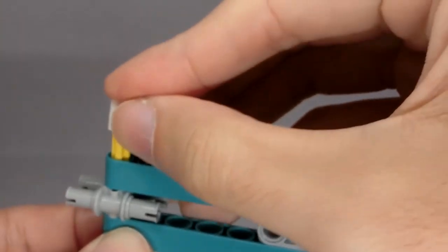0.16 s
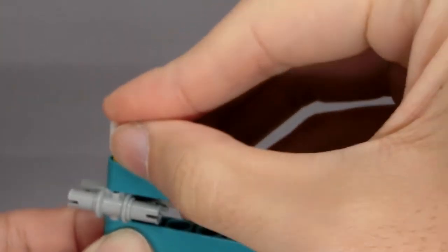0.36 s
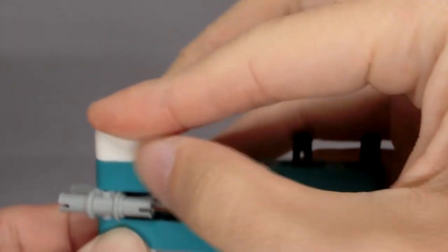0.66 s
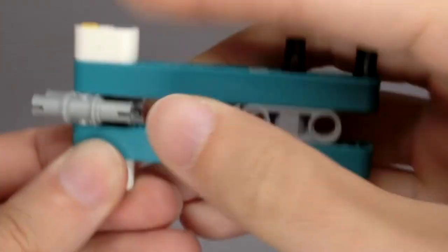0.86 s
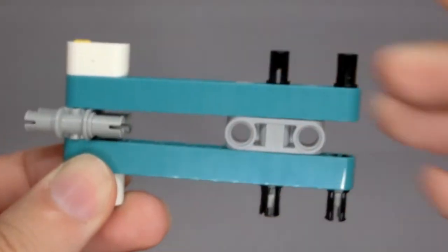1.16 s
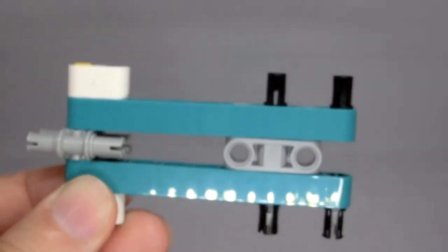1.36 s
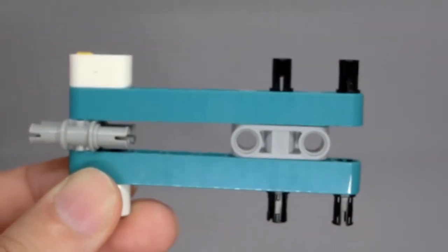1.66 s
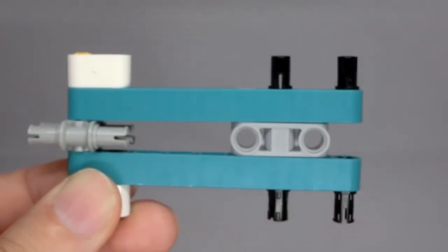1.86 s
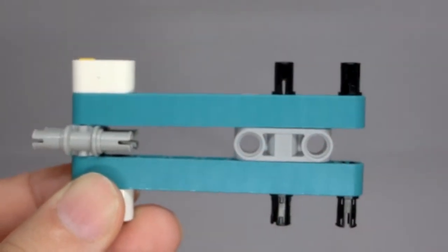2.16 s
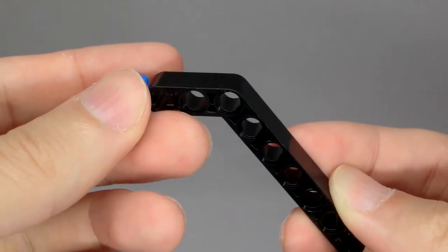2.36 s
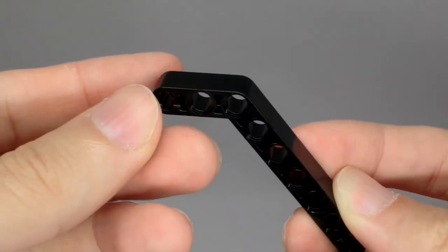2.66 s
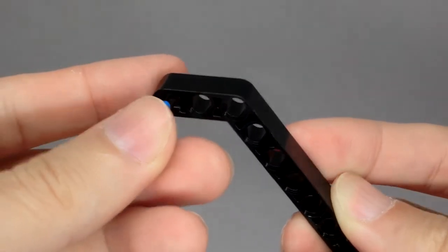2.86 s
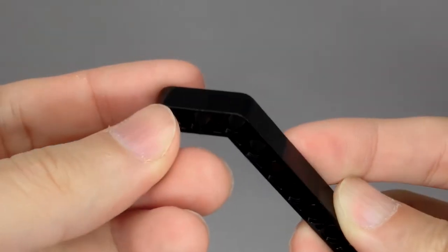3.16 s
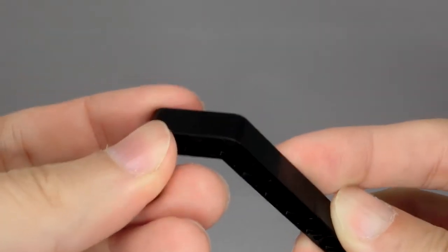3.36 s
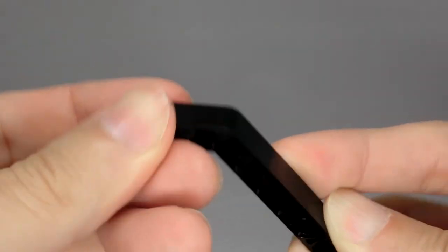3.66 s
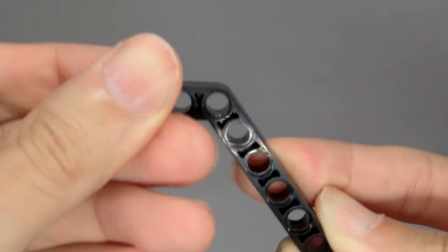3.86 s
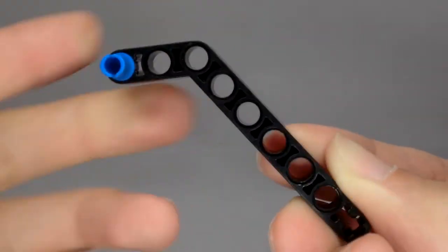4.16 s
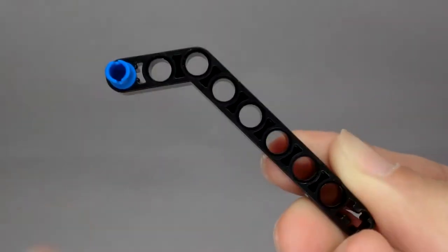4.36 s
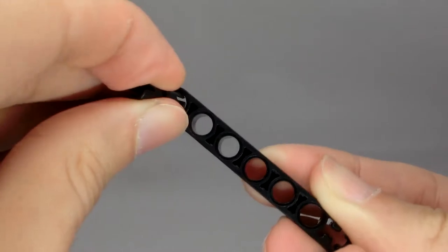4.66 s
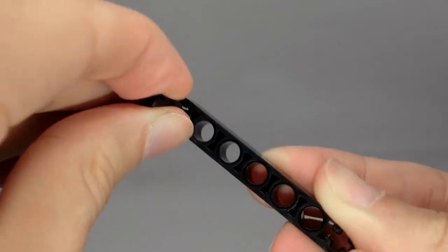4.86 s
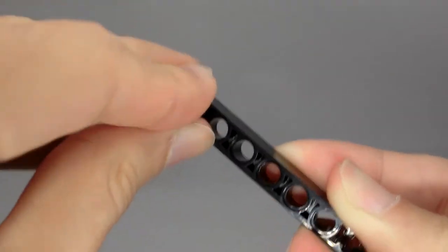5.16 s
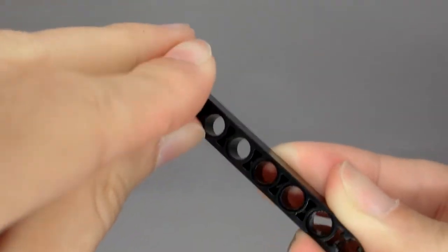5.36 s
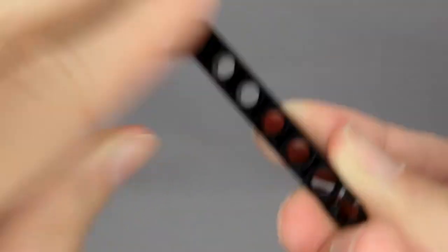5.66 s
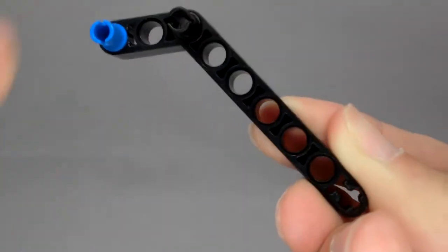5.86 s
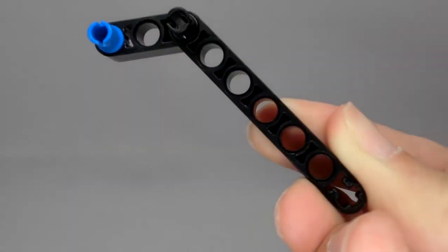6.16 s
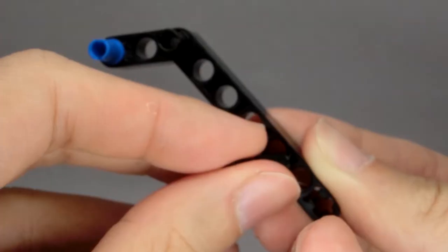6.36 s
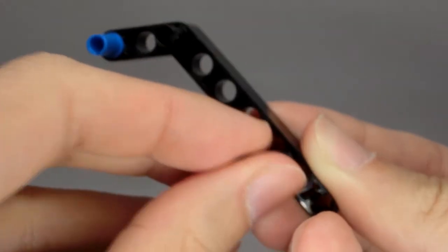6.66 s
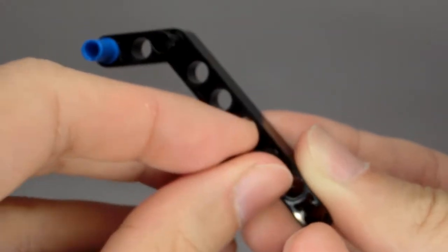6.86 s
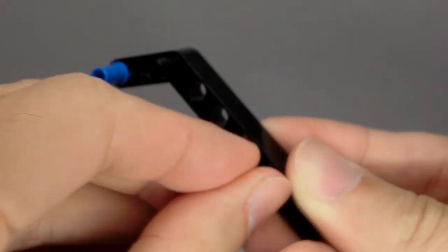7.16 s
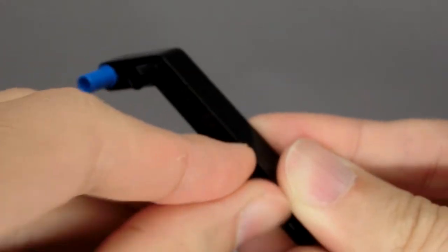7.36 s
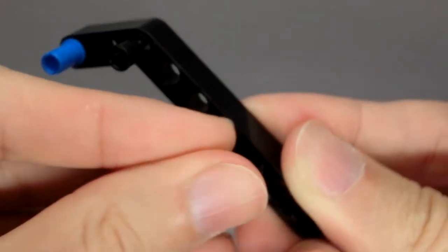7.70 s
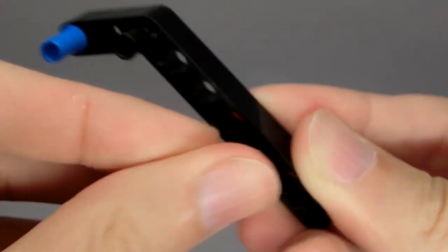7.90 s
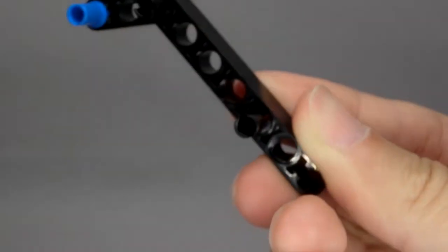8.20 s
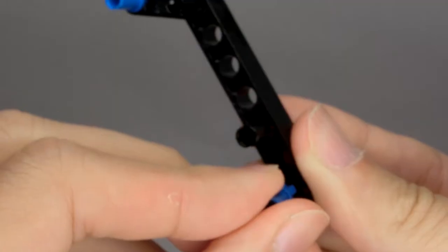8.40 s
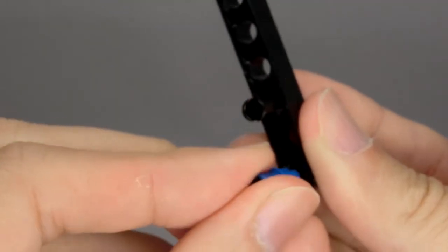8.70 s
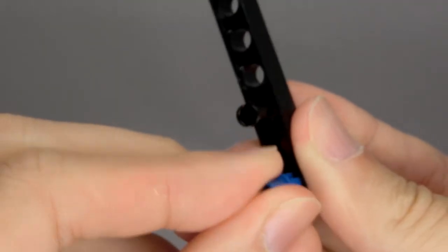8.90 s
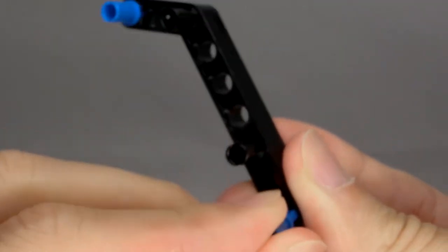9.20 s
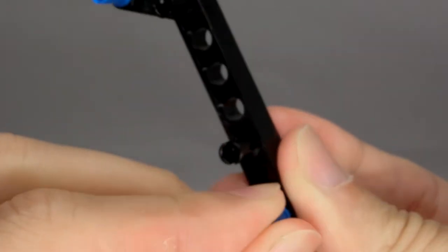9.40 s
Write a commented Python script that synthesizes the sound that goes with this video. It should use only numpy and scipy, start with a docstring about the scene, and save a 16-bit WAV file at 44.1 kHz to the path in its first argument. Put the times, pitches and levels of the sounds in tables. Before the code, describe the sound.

A quiet small room with steady faint hiss, slight rumble and a distant low motor hum; the pickup is close and in stereo. A light tick at 0.05 s leads to a sharp, bright plastic snap at 0.3 s and another, crisper one at 0.56 s, each a tight double hit with a few milliseconds of rattle and a short room reply. Weak ticks follow at 0.85, 1.17 and 2.0 s, then a sprinkle from 2.6 to 3.5 s, clearest near 2.76. Around 3.9 s fingertips rub jerkily with tiny thin squeaks, then a tick at 4.07 and a faint airy rub at 4.6. A third strong snap, lower and fuller, lands at 5.45 s. Small taps come at 6.7, 7.2 and 7.7 s, low soft rubs and a dull bump from 8.2, a click at 8.73 with faint squeaking to 9.2, and a final tap at 9.34.

```python
"""Three sharp snaps of plastic pins and connectors pressed by hand into plastic beams in a small quiet room.
Each snap is two quick landings and a rattle, filtered by the ring of the plastic; the room answers.
Fainter ticks are built the same way. Finger rubs are jerky noise in gliding resonances; squeaks are thin tones.
Behind them, soft hand bumps and a low motor hum are sines; a steady hiss and a faint rumble are noise."""
import sys
import numpy as np
from scipy import signal
from scipy.fft import rfft, irfft
from scipy.io import wavfile
from scipy.ndimage import uniform_filter1d

SR = 44100
rng = np.random.default_rng(int(sys.argv[2]) if len(sys.argv) > 2 else 0)


def materialize(psi):
    """Save the field psi as 16-bit PCM at rate SR to the path in sys.argv[1].

    A 1-D psi becomes a single channel; in a 2-D psi each row is a channel.
    """
    bounded = np.clip(np.atleast_2d(psi).T, -1, 1)
    quanta = np.round(bounded * 32767).astype(np.int16)
    wavfile.write(sys.argv[1], SR, quanta)


N = 420713  # length in samples, about 9.5 s

SWAP_S = 2.4  # clicks before this time are in a stack of parts, later ones in a single bent beam


def gain_of(db):
    """Turns decibels into an amplitude factor."""
    return 10 ** (np.asarray(db) / 20)


def evened(x):
    """Scales a signal to an rms of 1."""
    return x / np.sqrt(np.mean(x ** 2) + 1e-20)


def read(points, hz):
    """Reads a table of (frequency, value) between its points, on a log-frequency axis."""
    f, value = np.transpose(points)
    return np.interp(np.log(hz + 1), np.log(f + 1), value)


def add(mix, s, sound):
    """Adds a sound to both channels from time s, cut off at the end of the mix."""
    part = mix[:, max(round(s * SR), 0):][:, :sound.shape[-1]]
    part += sound[..., :part.shape[1]]


def pair(size, likeness):
    """Makes two channels of white noise that are partly alike."""
    a, b = rng.standard_normal((2, size))
    mixed = likeness * a + np.sqrt(1 - likeness ** 2) * b
    return np.array([mixed, a])


def causal(gain):
    """Finds the quickest-starting (minimum-phase) impulse response with this gain spectrum."""
    both_halves = np.r_[gain, gain[-2:0:-1]]
    log_gain = np.log(np.maximum(both_halves, 1e-6))
    spectrum = np.exp(np.conj(signal.hilbert(log_gain)))
    return irfft(spectrum[:len(gain)])


def coloured(sound, gains):
    """Filters each channel by its own gain spectrum."""
    responses = np.array([causal(gain) for gain in gains])
    return signal.fftconvolve(sound, responses, axes=1)


def colour(sound):
    """Finds the smoothed gain spectrum of a short sound."""
    power = np.abs(rfft(sound, 2048)) ** 2
    return np.sqrt(uniform_filter1d(power, size=19))


def air(hiss_db=-61.3, rumble_db=-66, rumble_hz=85):
    """Room noise: steady noise shaped over frequency, over a faint rumble of low-passed noise."""
    # shape of the hiss: f/Hz, relative level per Hz/dB
    air_levels = [(53, -27), (90, 2), (117, -2), (165, -3.5), (201, -1), (266, -7.5), (330, -8.5),
                  (430, -7.5), (620, -12), (1320, -17.5), (2800, -21), (4750, -23.5), (6400, -24.1),
                  (7200, -22.5), (11600, -23.5), (12300, -23.5), (13000, -24.5), (14700, -25), (16000, -39)]
    # how alike left and right are: f/Hz, likeness (1 = the same)
    air_likeness = [(60, 0.28), (150, 0.57), (380, 0.61), (950, 0.22), (2380, 0.093), (5980, 0.52),
                    (15000, 1)]
    # balance of the hiss: f/Hz, left over right/dB
    air_lean = [(60, 0), (240, -1), (950, -1), (3770, -1), (15000, 0)]
    hz = np.fft.rfftfreq(N, 1 / SR)
    a, b = rfft(rng.standard_normal((2, N)))
    same = read(air_likeness, hz)
    noise = np.array([a, same * a + np.sqrt(1 - same ** 2) * b])
    side_db = np.outer([.5, -.5], read(air_lean, hz))
    hiss = irfft(noise * gain_of(read(air_levels, hz) + side_db), N)
    hiss = gain_of(hiss_db) * hiss / hiss.mean(0).std()  # level of the average of both channels
    rumble_gain = hz / (hz + 40) / (1 + (hz / rumble_hz) ** 6)
    rumble = irfft(rfft(pair(N, likeness=0.8)) * rumble_gain, N)
    return hiss + gain_of(rumble_db) * evened(rumble)


def hum(hum_hz=58.25, hum_db=-55.3, octave_db=-23, left_over_right_db=-1):
    """A distant motor: one steady low sine and a weak one an octave above."""
    angle = 2 * np.pi * hum_hz * np.arange(N) / SR
    tone = np.sin(angle) + gain_of(octave_db) * np.sin(2 * angle)
    sides = gain_of([[left_over_right_db / 2], [-left_over_right_db / 2]])
    return gain_of(hum_db) * evened(tone) * sides


def bumps(bump_s=0.13):
    """Soft bumps of the hands: short low sines that swell and fade."""
    # t/s, peak level/dB, f/Hz
    bump_list = [(4.43, -52, 30.5), (5.72, -49, 30), (8.245, -45, 42.5)]
    out = np.zeros((2, N))
    for s, db, hz in bump_list:
        t = np.arange(int(bump_s * SR)) / SR
        add(out, s, gain_of(db) * np.sin(2 * np.pi * hz * t) * np.hanning(len(t)))
    return out


def squeaks(waver=.006, flutter_db=2):
    """Under a tight, steady grip the skin slips regularly: thin tones, wavering in pitch and level."""
    # t/s, length/s, rms level/dB, pitch at start/Hz, pitch at end/Hz (before the waver)
    squeak_list = [(3.862, 0.039, -70, 715, 694), (3.963, 0.026, -62, 740, 700),
                   (3.994, 0.069, -66.5, 645, 624), (8.729, 0.098, -69, 455, 490),
                   (8.8, 0.39, -74, 568, 573), (8.92, 0.19, -71.5, 480, 490)]
    out = np.zeros((2, N))
    for s, length, db, start_hz, end_hz in squeak_list:
        size = int(length * SR)
        slow_noise = uniform_filter1d(rng.standard_normal((2, SR)), size=1200)
        drift, grip = evened(slow_noise)[:, :size]
        hz = np.linspace(start_hz, end_hz, size) * (1 + waver * drift)
        tone = np.sin(2 * np.pi * np.cumsum(hz) / SR)
        tone = tone * gain_of(flutter_db * grip) * signal.windows.tukey(size, .5)
        add(out, s, gain_of(db) * evened(tone))
    return out


def resonate(x, hz, width):
    """Filters x by a resonance of gain 1 whose frequency follows the curve hz."""
    turn = np.exp(2j * np.pi * np.cumsum(hz) / SR)
    r = np.exp(-np.pi * width / SR)
    # shift the resonance down to zero, smooth there, shift back
    return 2 * (turn * signal.lfilter([1 - r], [1, -r], x / turn)).real


def rubs(grip_db=2.5):
    """Fingertips on plastic: skin sticks and slips in uneven jerks through a gliding resonance."""
    # t/s, length/s, rms level/dB, resonance at start/Hz, at end/Hz, width of each of two filters/Hz
    rub_list = [(3.862, 0.066, -66.5, 1120, 935, 280), (3.893, 0.03, -61, 418, 400, 200),
                (3.933, 0.019, -60, 660, 690, 200), (3.936, 0.02, -62, 450, 400, 200),
                (3.962, 0.06, -65.5, 640, 587, 300), (4.6, 0.054, -68, 2600, 1400, 3000),
                (4.575, 0.075, -70, 5000, 7500, 9000), (6.709, 0.024, -64.5, 1020, 985, 90),
                (8.211, 0.05, -65.5, 470, 430, 260), (8.27, 0.11, -66.5, 235, 205, 130),
                (8.537, 0.048, -59, 444, 420, 260), (8.586, 0.095, -65, 490, 440, 240),
                (8.69, 0.12, -64, 438, 470, 190)]
    out = np.zeros((2, N))
    for s, length, db, start_hz, end_hz, width in rub_list:
        size = int(length * SR)
        hz = np.linspace(start_hz, end_hz, size)
        grip = evened(uniform_filter1d(rng.standard_normal(SR), size=200))
        slips = (pair(SR, likeness=0.99) * gain_of(grip_db * grip))[:, :size]
        rub = np.array([resonate(resonate(side, hz, width), hz, width) for side in slips])
        add(out, s, gain_of(db) * evened(rub * signal.windows.tukey(size, .5)))
    return out


def room_tail(size, wall_s=0.017, wall_spread_s=0.00053, wall_db=-3):
    """The room's echoes: noise whose bands each die at their own speed, with a swell from the nearest wall."""
    # how fast the room goes quiet: f/Hz, time to fall by 60 dB/s
    room_decay = [(300, 0.27), (1500, 0.079), (4000, 0.18), (8000, 0.13), (15000, 0.12)]
    hz, t, bands = signal.stft(pair(size, likeness=0.91), SR, nperseg=256)
    fade = gain_of(-60 * t / read(room_decay, hz)[:, None])
    tail = signal.istft(bands * fade, SR, nperseg=256)[1][:, :size]
    t = np.arange(size) / SR
    build_up = 1 - np.exp(-t / 0.00092)
    wall = gain_of(wall_db) * np.exp(-((t - wall_s) / wall_spread_s) ** 2)
    tail = tail * (build_up + wall)
    return tail / np.linalg.norm(tail[0])


def contact(hz, click_db, ring_hz, slope_db, thud_db, thud_hz=657, thud_slope_db=10):
    """Spectrum of one contact: a click falling away on both sides of the small part's ring, over a low thud."""
    bright = click_db - slope_db * np.abs(np.log2((hz + 1) / ring_hz))
    # the thud is flat up to thud_hz and falls by thud_slope_db per octave above
    low = thud_db - thud_slope_db * np.maximum(np.log2((hz + 1) / thud_hz), 0)
    return np.hypot(gain_of(bright), gain_of(low))


def flex(hz, flex_hz, flex_db, width_share=.28):
    """Lifts the one bending resonance picked by the place of contact and the grip."""
    # width_share is the width as a share of the frequency
    return np.hypot(1, gain_of(flex_db) / (1 + (2 * (hz / flex_hz - 1) / width_share) ** 2))


def plastic(hz, modes, force, ring_hz, ring_db, valley_db=-3.5, ring_width_hz=780):
    """Spectrum of the short ring of a beam and of the small part that strikes it."""
    power = gain_of(valley_db) ** 2  # floor between the resonances
    for f, width, db in modes:
        power = power + gain_of(db) ** 2 / (1 + (2 * (hz - f) / width) ** 2) ** 2
    power = power * (1 + gain_of(ring_db) ** 2 / (1 + (2 * (hz - ring_hz) / ring_width_hz) ** 2))
    power = power / uniform_filter1d(power, size=220)  # keep the peaks, flatten the broad tilt
    low_cut = 1 / (1 + (240 / (hz + 1)) ** 2)  # small parts give off little bass
    high_cut = 1 / np.sqrt(1 + (hz / 15400) ** 36)
    return np.sqrt(power) * low_cut * high_cut * force


def prongs(t, gap_s, second_db=-10, spread_s=.0008):
    """The two prongs of a split pin land in turn; bending waves carry the treble ahead of the bass."""
    hz = np.fft.rfftfreq(len(t), 1 / SR)
    landings = 1 + gain_of(second_db) * np.exp(-2j * np.pi * hz * gap_s)
    delay = spread_s * (1 - hz / hz[-1])
    blow = irfft(landings * np.exp(-2j * np.pi * np.cumsum(delay) * hz[1]), len(t))
    blow = blow * (t < .005)
    return blow / np.linalg.norm(blow)


def rattle(t, rise_s=.0008, t60_s=.021, uneven_db=2):
    """A pin chatters in its hole: random pushes of uneven strength that start fast and fade."""
    uneven = evened(uniform_filter1d(rng.standard_normal(len(t)), size=20))
    pushes = np.sign(pair(len(t), likeness=.85))
    chatter = pushes * gain_of(-60 * t / t60_s) * (1 - np.exp(-t / rise_s))
    chatter = chatter * gain_of(uneven_db * uneven)
    # light contacts carry little bass
    chatter = signal.lfilter(*signal.butter(1, 1200, "high", fs=SR), chatter)
    return chatter / np.linalg.norm(chatter[0])


def lingering(t, rings, hz, strength):
    """A few sharp resonances sing on after the blow, each as strongly as the blow excites it."""
    phases = rng.uniform(0, 2 * np.pi, len(rings))
    out = np.zeros((2, len(t)))
    for (f, db, t60), phase in zip(rings, phases):
        fade = gain_of(-60 * t / t60)
        level = gain_of(db) * np.array([np.interp(f, hz, side) for side in strength])
        out += np.outer(level, np.sin(2 * np.pi * f * t + phase) * 2 * fade / fade.sum())
    return out


def click(s, hz, force, ring_hz, ring_db, chatter_db, pan_db, lean_full_hz=5500, ring_aim_db=9):
    """A pin springs home, chatters in its hole for some milliseconds, and the room answers."""
    # broad resonances of the stack, then of the bent beam: f/Hz, width/Hz, relative level/dB
    stack_modes = [(506, 560, -1), (1110, 300, 4), (1770, 1700, 8), (2710, 500, 2), (3650, 580, 5),
                   (5320, 1300, 0.5), (7250, 1600, 5), (9530, 900, 7.5), (10700, 2000, 3),
                   (12100, 2600, 10), (14400, 1400, 2)]
    beam_modes = [(250, 140, -1), (553, 120, 4), (760, 84, 4.5), (1035, 360, 8), (1690, 410, 4.5),
                  (2750, 590, 9), (3700, 890, 4), (5150, 980, -1), (6940, 2100, 2), (8000, 1700, -1),
                  (9600, 600, -1), (12040, 1200, -2), (14400, 600, -11)]
    # sharp resonances that outlast the blow: f/Hz, level over the broad ring/dB, time to fall by 60 dB/s
    stack_rings = [(2650, -5, .06), (3460, 3, .08), (6900, -3, .085), (10600, -11, .08), (12100, -19, .09)]
    beam_rings = [(1600, -12, .04), (4070, -4, 0.04), (6980, -3, 0.045), (9020, -4, .035)]
    if s < SWAP_S:
        modes, rings, gap_s, room_db = stack_modes, stack_rings, 0.000281, -14.5
    else:
        modes, rings, gap_s, room_db = beam_modes, beam_rings, 0.000214, -13
    t = np.arange(SR // 4) / SR
    landing = prongs(t, gap_s)
    blow = landing + gain_of(chatter_db) * rattle(t)
    # chatter lengthens a click without changing its colour
    steady = colour(landing) / colour(blow.mean(0))
    # bass spreads to both sides alike; the treble leans fully from lean_full_hz up
    sides = gain_of(np.outer([.5, -.5], pan_db * np.minimum(hz / lean_full_hz, 1)))
    strength = plastic(hz, modes, force, ring_hz, ring_db) * sides / sides.mean(0)
    direct = coloured(blow, strength * steady)
    add(direct, 0, lingering(t, rings, hz, strength))
    # less of the small part's ring reaches the room
    spread = plastic(hz, modes, force, ring_hz, ring_db - ring_aim_db)
    echo = coloured(room_tail(len(t)), spread * np.sqrt(sides))
    return direct + gain_of(room_db) * echo


def ticks():
    """Light ticks and taps of parts touching: a click and a thud, with no knock."""
    # levels are relative, before the plastic shapes them: t/s, click/dB, ring of the small part/Hz,
    # click slope/dB per octave, thud/dB, left over right in the treble/dB, ring/dB, flex/Hz, flex/dB
    tick_list = [(0.0481, -14, 1370, 18, -24, -4, 0, 2400, 6),
                 (0.0496, -22, 1400, 16, -37, -6, 8, 2200, -6), (0.3351, -18, 12200, 4, -8, -4, 0, 1080, 1),
                 (0.494, -25.5, 4700, 15, -41, -2, 2, 8200, 2),
                 (0.852, -33.5, 7400, 2, -39, -2, 4, 3200, 2),
                 (1.1626, -23, 2450, 9.5, -23, 16, 8, 6850, 10),
                 (1.1663, -23, 1400, 16, -19, 8, 0, 1150, 1), (1.1845, -34, 7800, 14, -40, 4, 5, 2500, 0),
                 (1.994, -26, 10900, 6, -20, 13, 3, 7500, -11),
                 (2.6064, -28, 12790, 8, -32, 10, 6, 9000, -6),
                 (2.756, -17.5, 8500, 7.5, -31, -4, 9, 3100, 10),
                 (2.7562, -22, 15300, 36, -45, -4, 20, 15000, 2),
                 (2.7612, -25, 8200, 10, -38, -4, 4, 3900, 5),
                 (2.7631, -18.5, 8700, 8.5, -36, -4, 10, 4270, 12),
                 (2.882, -29, 6830, 12, -34, -3, 13, 4000, -6),
                 (2.9737, -30, 6990, 9, -40, -2, 8, 4000, -6),
                 (3.2357, -27.5, 8800, 1.5, -15.5, -4, 12, 6700, 8),
                 (3.5155, -26, 1650, 12, -11, -5, 2, 227, 15),
                 (3.5164, -25, 5850, 14, -26, -3, 13, 8300, 11),
                 (4.07, -20.5, 11300, 9.5, -41, -2, 12, 6500, -2),
                 (4.072, -24, 12000, 10, -37, -6, 10, 7500, -6),
                 (4.9256, -25.5, 12500, 8.5, -33, 15, 6, 8000, 3),
                 (6.737, -26, 7150, 12, -36, -4, 7, 4000, -6),
                 (7.1855, -19, 5500, 5.5, -6.5, -5, 7, 3700, 5.5),
                 (7.188, -29, 8000, 10, -16.5, -1, 11, 1030, 12),
                 (7.695, -30.5, 6090, 3, -29, -8, 4, 3700, 1),
                 (7.7153, -29, 2800, 2, -14.5, -6, 1, 8000, 0),
                 (7.9508, -28.5, 12770, 7, -26, -8, 6, 8000, -6),
                 (8.7347, -17.5, 6950, 9, -34, -4, 9, 3600, -2),
                 (8.7376, -19.5, 6900, 14, -33, -6, 9, 3600, -4),
                 (9.3443, -20, 7500, 10, -15, -4, -5, 5100, 7),
                 (9.346, -22.5, 7500, 9.5, -17.5, -4, -5, 4600, 6)]
    out = np.zeros((2, N))
    hz = np.fft.rfftfreq(2048, 1 / SR)
    for s, click_db, ring_hz, slope_db, thud_db, pan_db, ring_db, flex_hz, flex_db in tick_list:
        force = contact(hz, click_db, ring_hz, slope_db, thud_db) * flex(hz, flex_hz, flex_db)
        chatter_db = -1 if s < SWAP_S else 2
        add(out, s, click(s, hz, force, ring_hz, ring_db, chatter_db, pan_db))
    return out


def snaps(knock_width_oct=0.68):
    """Pins snapping home: a full snap also gives a broad knock to the beam that it lands in."""
    # levels are relative, before the plastic shapes them: t/s, click/dB, ring of the small part/Hz,
    # click slope/dB per octave, thud/dB, left over right in the treble/dB, knock/dB, knock/Hz,
    # ring/dB, chatter/dB, flex/Hz, flex/dB
    snap_list = [(0.3054, 10, 10400, 10, -8.5, -6, -5, 1750, 2, -1.5, 5200, 2),
                 (0.5633, 6.5, 12100, 13, -12.5, -4.5, -8.5, 2820, 12, 3, 3200, 2.5),
                 (5.4501, 0.5, 12400, 6, -1, -5, 1, 1380, -6, -0.5, 4600, 6)]
    out = np.zeros((2, N))
    hz = np.fft.rfftfreq(2048, 1 / SR)
    for (s, click_db, ring_hz, slope_db, thud_db, pan_db, knock_db, knock_hz,
         ring_db, chatter_db, flex_hz, flex_db) in snap_list:
        octaves_off = np.log2((hz + 1) / knock_hz)
        knock = gain_of(knock_db) / (1 + (octaves_off / knock_width_oct) ** 2) ** 2
        touch = contact(hz, click_db, ring_hz, slope_db, thud_db)
        force = np.hypot(touch, knock) * flex(hz, flex_hz, flex_db)
        add(out, s, click(s, hz, force, ring_hz, ring_db, chatter_db, pan_db))
    return out


def scene():
    """Snaps, ticks and handling over the quiet room."""
    return air() + hum() + bumps() + squeaks() + rubs() + ticks() + snaps()


def record(dry, edge_hz=15900):
    """Removes the treble above edge_hz with a steep low-pass filter."""
    low_pass = signal.firwin(255, edge_hz, window=("kaiser", 9), fs=SR)
    return signal.oaconvolve(dry, low_pass[None], "same")


dry = scene()
out = record(dry)
materialize(out)
```